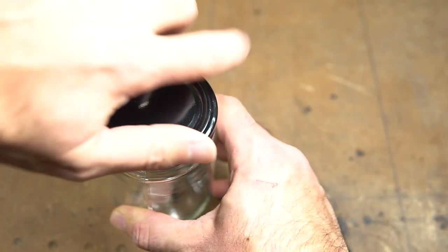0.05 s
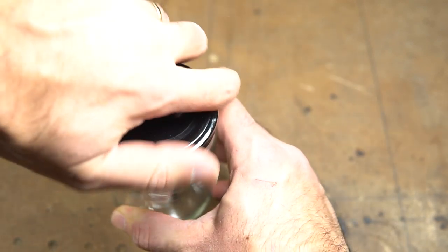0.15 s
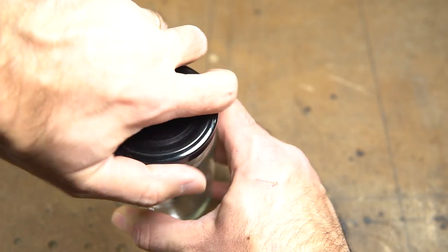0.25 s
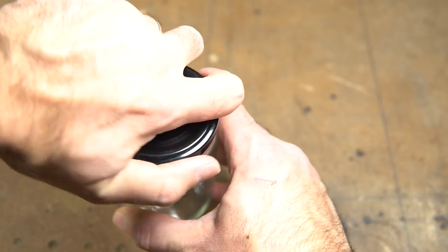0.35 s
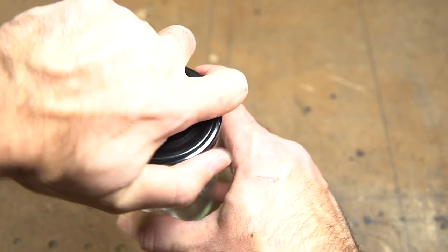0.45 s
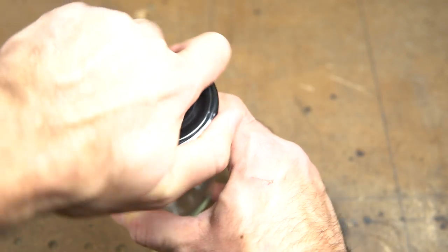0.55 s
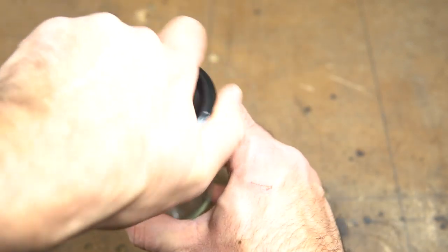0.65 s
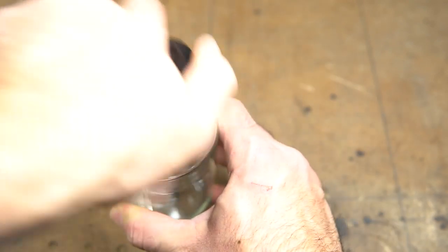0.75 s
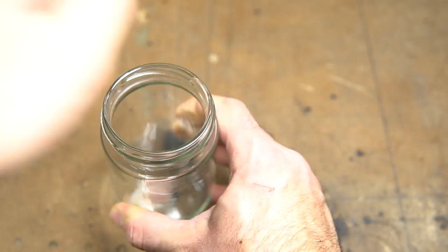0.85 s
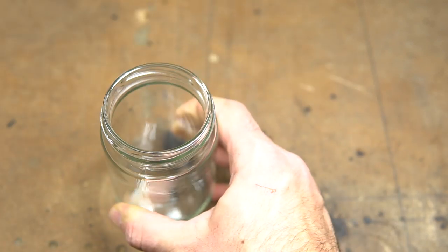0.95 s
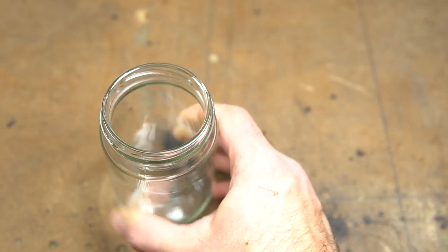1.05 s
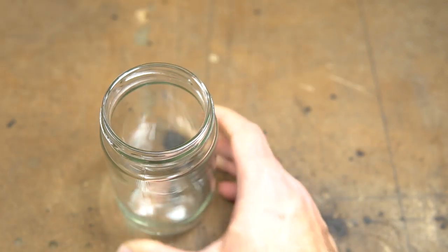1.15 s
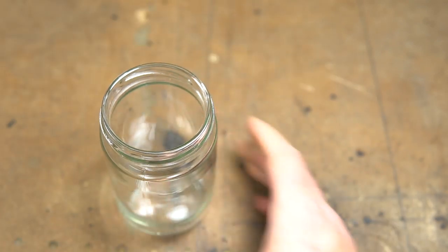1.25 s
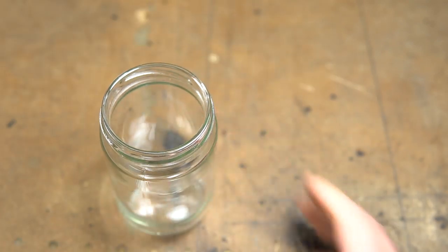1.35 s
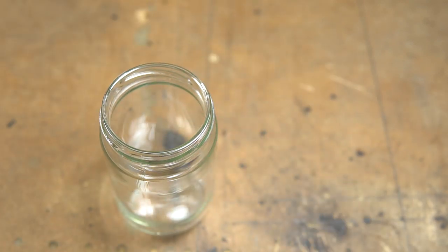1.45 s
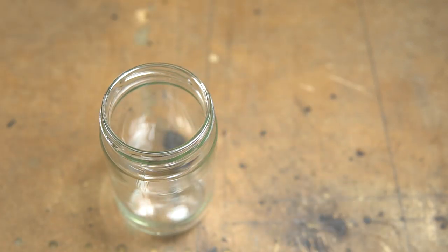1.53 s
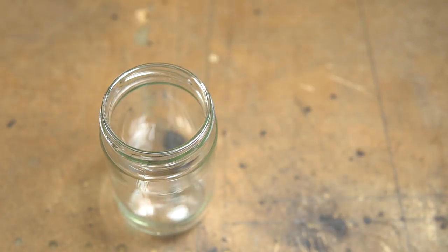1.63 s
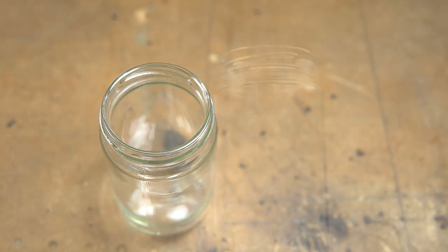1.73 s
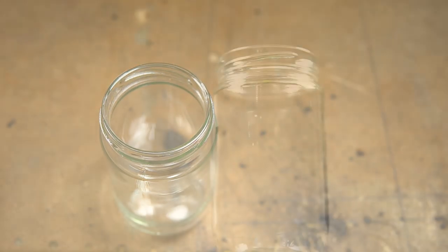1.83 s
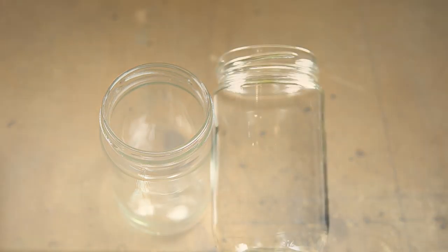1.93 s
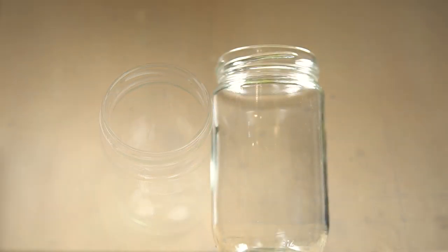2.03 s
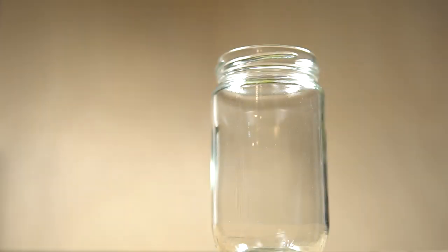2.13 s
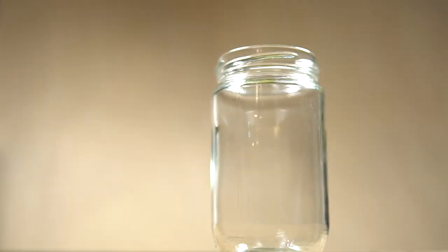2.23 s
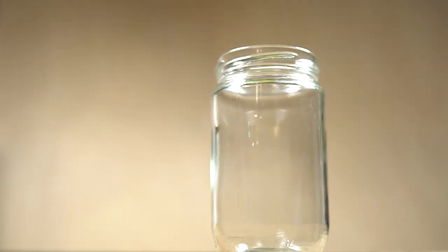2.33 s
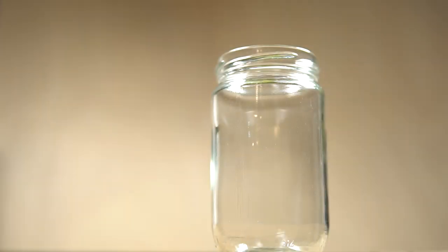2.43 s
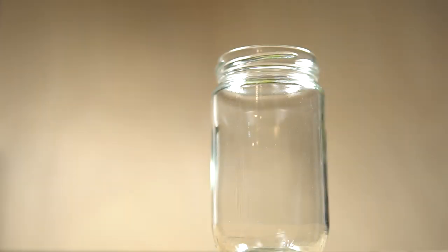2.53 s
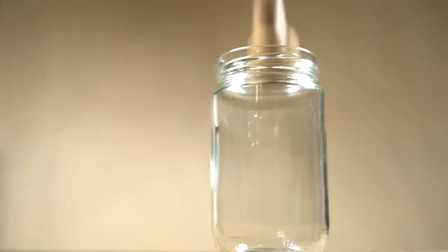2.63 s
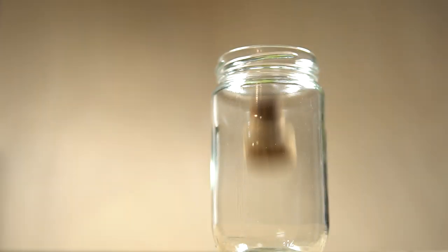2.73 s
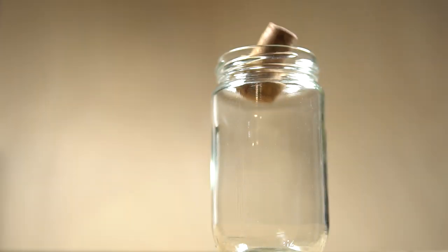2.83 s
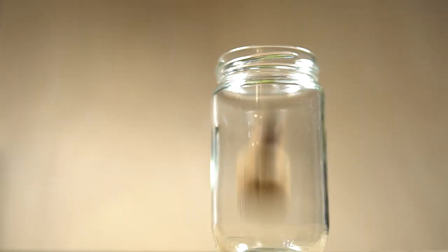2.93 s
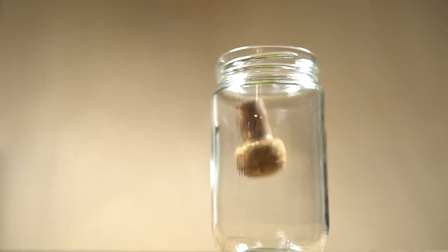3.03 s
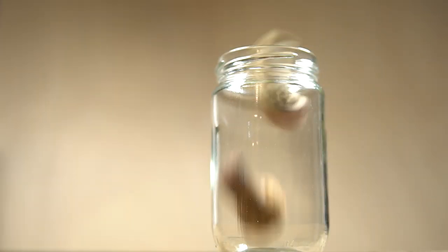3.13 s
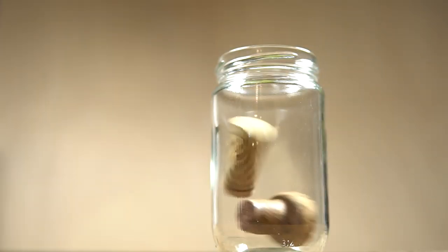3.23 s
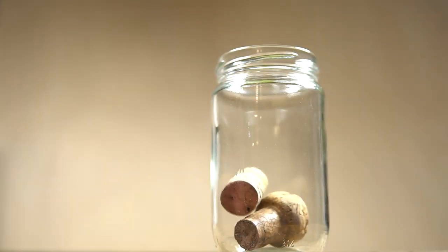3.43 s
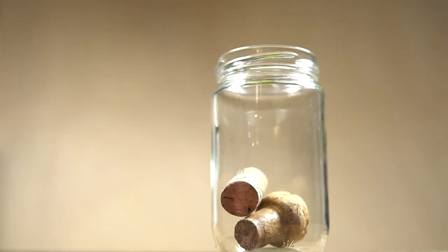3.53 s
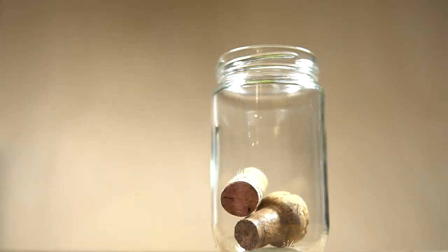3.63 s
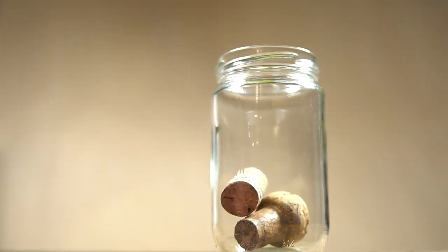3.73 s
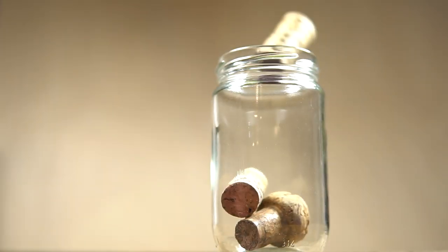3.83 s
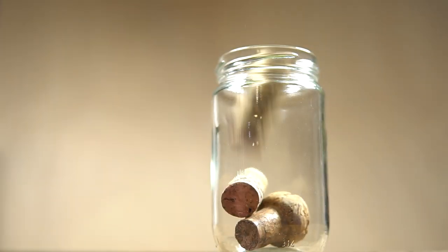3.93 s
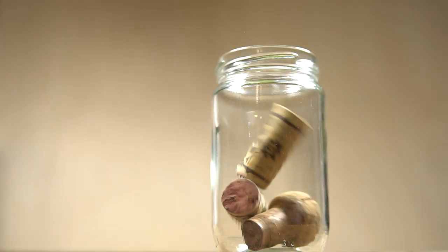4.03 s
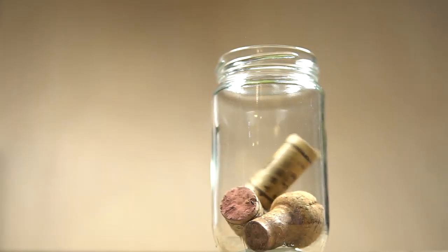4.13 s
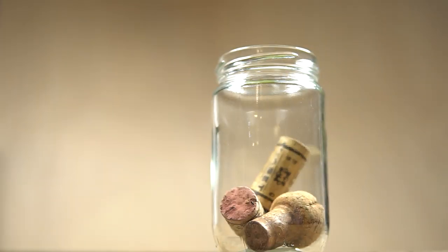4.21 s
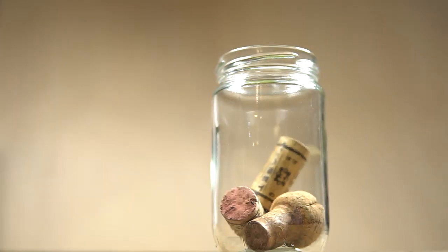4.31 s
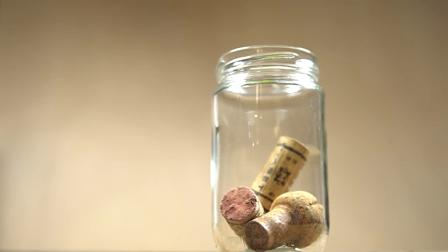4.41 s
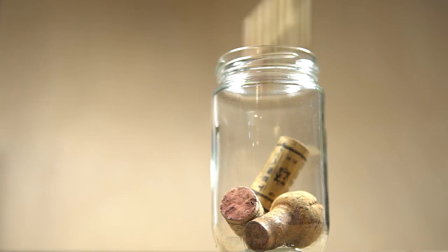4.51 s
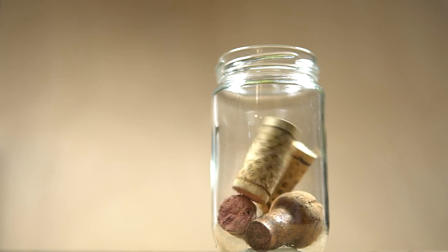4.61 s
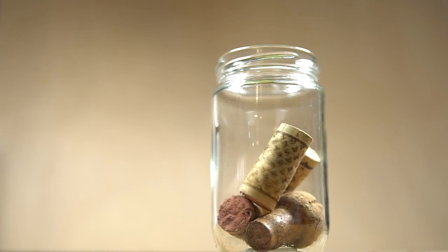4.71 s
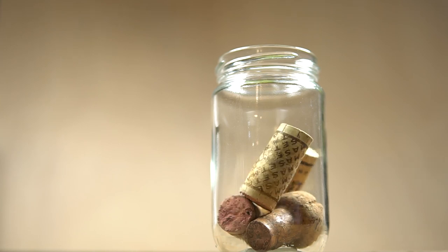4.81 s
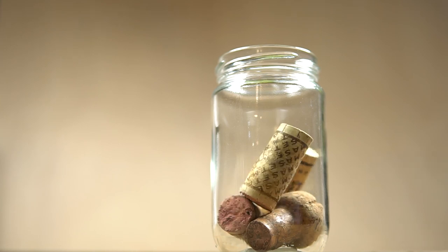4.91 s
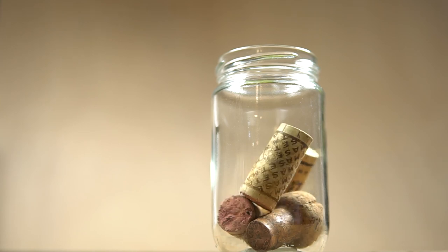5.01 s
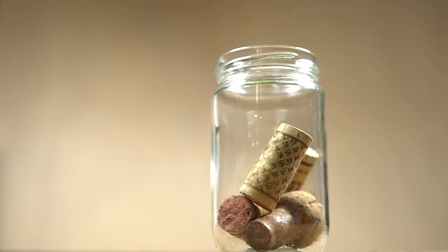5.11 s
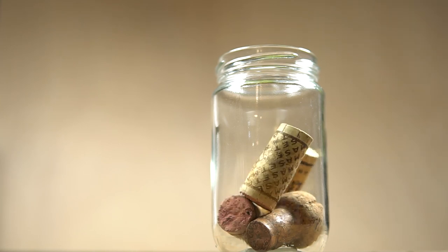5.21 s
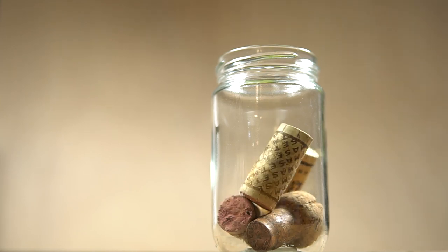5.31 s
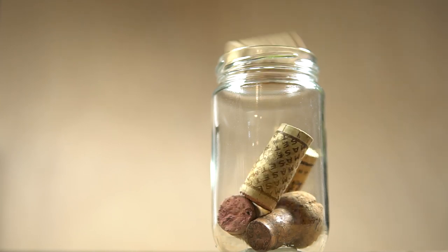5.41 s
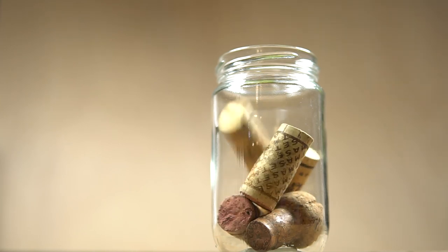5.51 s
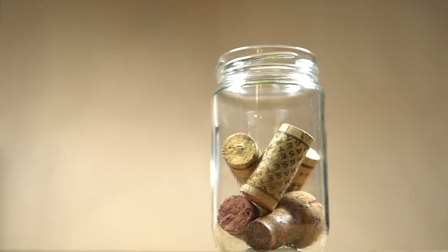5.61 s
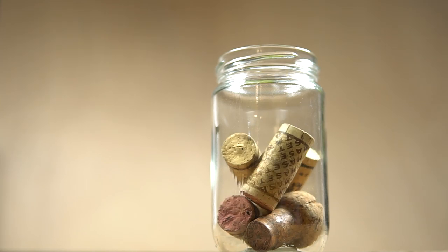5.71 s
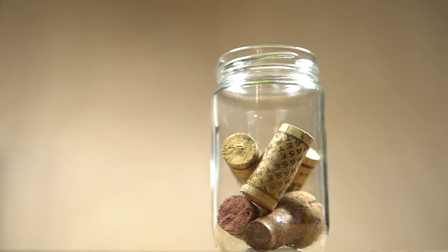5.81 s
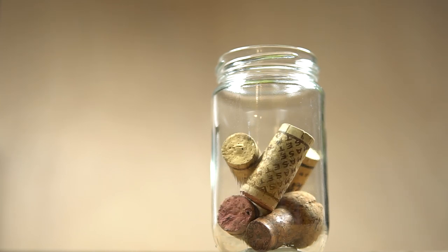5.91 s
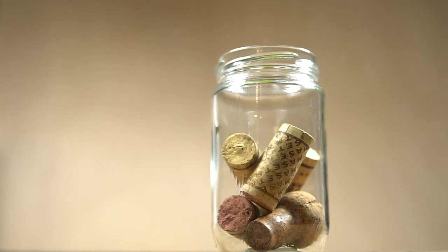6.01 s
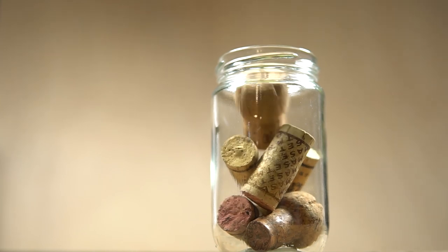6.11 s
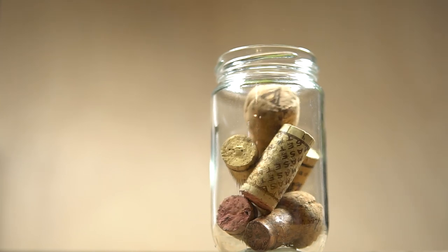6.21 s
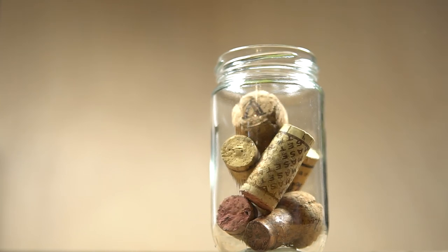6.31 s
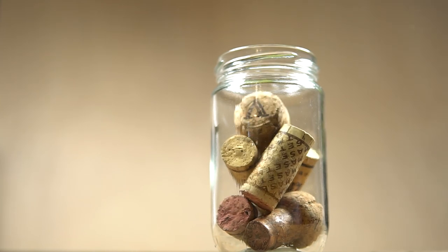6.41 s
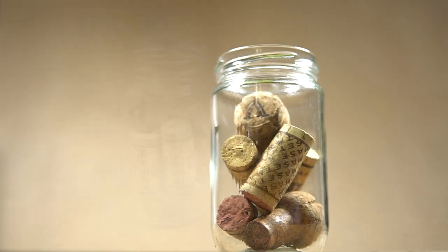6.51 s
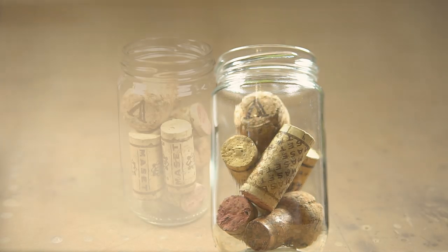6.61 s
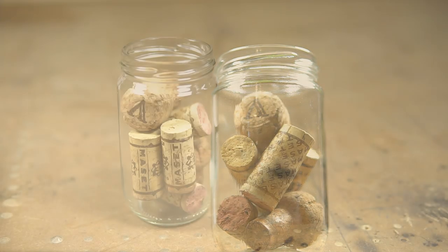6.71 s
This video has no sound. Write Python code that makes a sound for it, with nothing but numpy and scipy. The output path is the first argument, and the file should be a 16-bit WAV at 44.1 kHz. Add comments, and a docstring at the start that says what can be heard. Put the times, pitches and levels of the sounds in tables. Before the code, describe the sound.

Jar lid twisted off with gritty squeaks and ticks, soft set-down, then wine corks clatter singly into the glass amid light rustling, close indoors.

```python
"""In a small room, a hand twists the metal lid off an empty glass jar, sets the jar down and slides away.
The room tone then cross-fades to a more rumbling one, and corks drop into the jar one by one.
Each blow is decaying sines for table, air and glass plus noise bursts; the lid is random slips through resonances.
Fingers rustle among the waiting corks as grainy noise. Direct sounds are centred; echoes and room tone spread out.
"""
import sys
import numpy as np
from scipy import signal
from scipy.fft import rfft, irfft
from scipy.io import wavfile
from scipy.ndimage import uniform_filter1d

SR = 44100
rng = np.random.default_rng(int(sys.argv[2]) if len(sys.argv) > 2 else 0)


def dump(signal):
    """Clip the signal to [-1, 1] and save it as 16-bit WAV at the path in sys.argv[1]."""
    limited = np.clip(np.atleast_2d(signal).T, -1, 1)
    pcm = np.round(limited * 32767).astype(np.int16)
    wavfile.write(sys.argv[1], SR, pcm)


N = 297657


def amp(db):
    """Turn decibels into a linear gain."""
    return 10 ** (np.asarray(db) / 20)


def unit(x):
    """Scale to an RMS of 1."""
    return x / np.sqrt(np.mean(x ** 2))


def peak(x):
    """Scale to a peak of 1."""
    return x / np.abs(x).max()


def shape(x, points):
    """Colour a signal by (Hz, dB) points, joined along log frequency."""
    hz, db = np.transpose(points)
    f = np.maximum(np.arange(len(x) // 2 + 1) * SR / len(x), 1)
    gain = amp(np.interp(np.log(f), np.log(hz), db))
    return irfft(rfft(x) * gain, len(x))


def band(x, lo_hz, hi_hz):
    """Keep one band of frequencies."""
    edges = [lo_hz, min(hi_hz, .45 * SR)]
    return signal.sosfilt(signal.butter(2, edges, "bandpass", fs=SR, output="sos"), x)


def curve(rows, column=1, outside=-120):
    """Draw one table column as a line over time."""
    rows = np.array(rows)
    return np.interp(np.arange(N) / SR, rows[:, 0], rows[:, column], outside, outside)


def walk(rate):
    """Random levels held 1 / rate s and slewed twice; RMS 1 after the cut to length."""
    hold = int(SR / rate)
    steps = np.repeat(rng.standard_normal(N // hold + 1), hold)
    return unit(uniform_filter1d(uniform_filter1d(steps, hold), hold)[:N])


def fade(t, t60):
    """Exponential decay that loses 60 dB in t60 seconds."""
    return np.exp(-np.log(1000) * t / t60)


def swell(t, rise_s):
    """Soft onset of a body that takes a moment to answer."""
    return 1 - np.exp(-t / rise_s)


def ring(t, modes, spread_db, chance):
    """Decaying sines; the place of the blow sets how strongly each one starts."""
    return sum(amp(db + spread_db * c) * fade(t, t60) * np.sin(2 * np.pi * hz * t)
               for (hz, db, t60), c in zip(modes, chance))


def resonate(x, hz, width_hz):
    """Pass a signal through one narrow resonance."""
    return signal.lfilter(*signal.iirpeak(hz, hz / width_hz, SR), x)


def grains(rate, spread_db):
    """Uneven slips: random clicks of very different size, rate per second on average."""
    hits = rng.random(N) < rate / SR
    return hits * rng.standard_normal(N) * amp(spread_db * rng.exponential(size=N))


def add(out, s, x):
    """Mix a sound in, starting at s seconds."""
    i = int(s * SR)
    out[i:i + len(x)] += x[:N - i]


# Blows on the jar, with the drive into each part before that part's own mode levels and trims:
# start_s, knock_db, table_db, air_db, air_pitch_hz, overtone_db, wall_db, shoulder_db, crack_db
JAR_BLOWS = [(1.1155, -48, -58, -50, 602, -64, -62, -58, -54.5),
             (1.1313, -48.5, -47.5, -68, 620, -55, -79, -75, -64),
             (2.7644, -23.5, -20.5, -23.5, 643, -21.5, -39, -58, -20.5),
             (2.9182, -31.5, -43.5, -31, 560, -26.5, -28, -46, -47),
             (3.0297, -21.5, -17, -18.5, 638, -15.5, -42.5, -57, -29),
             (3.158, -42, -60.5, -60, 610, -65.5, -71.5, -75, -71.5),
             (3.1789, -27, -41, -15, 604, -44, -30.5, -61, -34.5),
             (3.2192, -31, -23.5, -18, 622, -24.5, -30.5, -44, -39),
             (3.2347, -45, -40, -23, 640, -36, -49, -56, -38),
             (3.2515, -29, -32.5, -25, 623, -7, -37, -60, -29.5),
             (3.265, -25.5, -27, -16.5, 647.5, -43, -41, -62, -37),
             (3.2994, -37, -58, -24, 651, -51, -40, -68, -64),
             (3.3242, -40, -43, -46, 616, -48, -57, -62, -45),
             (3.3486, -42, -54.5, -27.5, 638, -13, -37, -67, -33),
             (3.3667, -26.5, -32, -22.5, 644.4, -22, -66, -73, -57),
             (3.4101, -41, -37.5, -25.5, 650, -50, -68.5, -77, -54),
             (3.4444, -37.5, -42.5, -29.5, 655, -64, -64, -69, -62),
             (3.8374, -19.5, -33, -17.5, 637, -34, -33.5, -33, -25.5),
             (3.8603, -25.5, -37, -20, 657, -23, -33, -37.5, -35),
             (3.8846, -45, -36, -29.5, 650, -58, -37, -40, -39.5),
             (3.9879, -56, -51, -34, 638, -51, -56.5, -61, -53),
             (4.0259, -37, -33, -25, 676, -33, -47.5, -50, -35),
             (4.0445, -34, -38.5, -31, 652, -64, -45, -51, -40.5),
             (4.1314, -34, -37, -27, 672, -41, -59, -56, -43),
             (4.6166, -50.5, -34.5, -30.5, 707, -47.5, -63.5, -54, -39),
             (4.6284, -26.5, -35, -24, 707, -22, -55, -66, -40),
             (4.6417, -52, -37.5, -30.5, 688, -47, -38, -54, -36.5),
             (4.6597, -50.5, -40, -48, 660, -51, -51.5, -68, -41.5),
             (4.9303, -38.5, -68.5, -63, 668, -51, -69.5, -72, -45.5),
             (5.4676, -51, -48, -29, 640, -51, -53, -63, -51),
             (5.4809, -40, -41, -21.5, 650, -59, -43, -57, -47.5),
             (5.5189, -42, -40, -38.5, 697, -42.5, -72, -61, -42.5),
             (5.5583, -60, -44, -46.5, 677, -55, -49, -64, -49),
             (5.624, -41, -51, -35.5, 690, -58, -69, -59, -48),
             (5.634, -40.5, -42, -39, 720, -51.5, -51, -76, -43.5),
             (6.1538, -23.5, -28.5, -15.5, 639, -52.5, -32.5, -40.5, -39),
             (6.1754, -43, -54, -20.5, 689, -50, -60, -51, -33.5),
             (6.1885, -24, -29, -45, 670, -25, -35, -53, -52),
             (6.2306, -35.5, -51, -33.5, 665, -24, -64, -59, -46),
             (6.2568, -58, -55.5, -44, 630, -57, -70, -68, -39),
             (6.3616, -41.5, -51, -39, 677, -47, -70.5, -66, -38.5)]
# knocks above this level stop the ring already in the glass, dB lost per dB above
GRIP_FROM_DB, GRIP_SLOPE = -40, .75
# corks resting on the glass damp it: extra dB lost per s of ring, per s of filling
FILL_FROM_S, FILL_DB = 3.2, -18


def jar():
    """Every blow thuds the table, sounds the air column and its overtone, rings the glass and cracks."""
    out, rings, t = np.zeros(N), np.zeros(N), np.arange(int(.6 * SR)) / SR
    rows = np.array(JAR_BLOWS)
    chance, noise = rng.standard_normal((len(rows), 9)), rng.standard_normal((len(rows), 3, 2048))
    # a cork landing hard takes energy out of the ring already there
    kept_db = np.zeros(N + len(t))
    kept_db[(rows[:, 0] * SR).astype(int)] = -GRIP_SLOPE * np.maximum(rows[:, 1] - GRIP_FROM_DB, 0)
    kept_db = np.cumsum(kept_db)
    for (s, knock, table, air, air_hz, over, wall, shoulder, crack), c, n in zip(rows, chance, noise):
        i = int(s * SR)
        damping_db = kept_db[i:i + len(t)] - kept_db[i] + FILL_DB * max(s - FILL_FROM_S, 0) * t
        add(rings, s, amp(damping_db) * glass_ring(t, wall, shoulder, crack, c))
        x = jar_air(t, s, air, air_hz, over, c) + table_and_base(t, s, table, crack, c, n[2])
        x[:2048] += impact_noise(t[:2048], knock, crack, n)
        add(out, s, x)
    return out, rings


# Ring of the jar's wall, before damping by the corks: pitch_hz, level_db, t60_s
WALL_MODES = [(3303, 0, .36), (3333, -12, .3), (10360, -22, .1), (13800, -25, .06)]
# Ring of the jar's shoulder, before the same damping: pitch_hz, level_db, t60_s
SHOULDER_MODES = [(7068, -1, .14)]
# Ring of the jar's neck, before the same damping: pitch_hz, level_db, t60_s
NECK_MODES = [(6115, -6, .09)]
NECK_DB = -10.5  # relative to the crack


def glass_ring(t, wall_db, shoulder_db, crack_db, chance):
    """Wall, shoulder and neck vibrate as long thin decaying sines."""
    glass = amp(wall_db) * ring(t, WALL_MODES, 0.47, chance)
    glass += amp(shoulder_db) * ring(t, SHOULDER_MODES, 1, chance)
    glass += amp(crack_db + NECK_DB) * ring(t, NECK_MODES, 1, chance[1:])
    return swell(t, 0.00033) * glass


AIR_T60_S, OVERTONE_T60_S, AIR_SWELL_S = 0.072, 0.021, 0.00029
# the overtone drops as corks come to lie on the bottom; each blow scatters it by a share of its pitch
OVERTONE_S, OVERTONE_HZ, OVERTONE_SCATTER = (3.22, 3.25), (2079, 1967), 0.021


def jar_air(t, s, air_db, air_hz, over_db, chance):
    """The air in the jar answers a blow with a short hollow note and a shorter overtone."""
    over_hz = np.interp(s, OVERTONE_S, OVERTONE_HZ) * (1 + OVERTONE_SCATTER * chance[8])
    note = ring(t, [(air_hz, air_db, AIR_T60_S)], 0, chance)
    overtone = ring(t, [(over_hz, over_db, OVERTONE_T60_S)], 0, chance)
    return swell(t, AIR_SWELL_S) * (overtone - note)


# Thud of the wooden table: pitch_hz, level_db, t60_s
TABLE_MODES = [(59.8, -7.5, 0.11), (115, -6.5, 0.15), (169.5, -8.5, 0.125), (218.1, -1.5, 0.21),
               (247, -7.5, 0.19), (268.5, -2, 0.14), (314.6, -3, 0.042), (397, -6, 0.081),
               (430, -19.5, 0.0912)]
# Ring of the jar's base, before its glide bends pitch and decay: pitch_hz, level_db, t60_s
BASE_MODES = [(2930, -3, .11), (3010, -5, .13), (3100, -7, .1), (3300, -3, .03), (3817, -15, .14),
              (4818, -12, .04)]
# Ring of the jar's rim: pitch_hz, level_db, t60_s
RIM_MODES = [(9320, -3, .045), (15640, -18, .04)]
BASE_DB, RIM_DB = -8.5, -4.5  # base relative to the table thud, rim to the crack
# corks come to lie on the bottom between these times: base and rim are muffled
COVER_S, COVER_BASE_DB, COVER_RIM_DB = (3.25, 3.77), -23, -8.5
FIRST_CORK_S, HELD_DB = 2, -9  # before this the base is held on the table and stays dull
# the base starts this share flat and rises to the same share sharp as the cork lifts off
BASE_GLIDE, BASE_GLIDE_S = 0.02, .05
RATTLE_DB, RATTLE_T60_S = -8, 0.075


def table_and_base(t, s, table_db, crack_db, chance, noise):
    """The heavy table swells slowly, base and rim ring on it, and the jar chatters after the blow."""
    cover = np.interp(s, COVER_S, (0, 1))
    base_db = table_db + BASE_DB + cover * COVER_BASE_DB + HELD_DB * (s < FIRST_CORK_S)
    rim_db = crack_db + RIM_DB + cover * COVER_RIM_DB
    loose = amp(table_db) * swell(t, 0.0017) * ring(t, TABLE_MODES, 1.0, chance)
    rising = t + BASE_GLIDE * (t - 2 * BASE_GLIDE_S * swell(t, BASE_GLIDE_S))
    loose += amp(base_db) * ring(rising, BASE_MODES, 2.5, chance)
    loose += amp(rim_db) * ring(t, RIM_MODES, 0.88, chance)
    # the chatter stirs these modes again
    chatter = noise * fade(t[:len(noise)], RATTLE_T60_S)
    chatter /= np.linalg.norm(chatter)
    return loose + amp(RATTLE_DB) * signal.fftconvolve(loose, chatter)[:len(t)]


KNOCK_T60_S, CRACK_T60_S = 0.03, 0.011
CLATTER_DB, CLATTER_T60_S = -17, 0.13  # relative to the crack


def impact_noise(t, knock_db, crack_db, noise):
    """A dull knock and a bright crack, which leaves a short noisy tail in the jar."""
    crack = amp(crack_db) * unit(band(noise[0], 4940, 12000)) * fade(t, CRACK_T60_S)
    clatter = amp(crack_db + CLATTER_DB) * unit(band(noise[2], 1800, 8100)) * fade(t, CLATTER_T60_S)
    knock = amp(knock_db) * peak(band(noise[1], 600, 1700) * fade(t, KNOCK_T60_S))
    return crack + clatter + knock


# Resonances of the metal lid: pitch_hz, width_hz, level_db
LID_MODES = [(1700, 60, -5.5), (1804, 113, -1), (1890, 242, 0), (2480, 330, -8.5), (3290, 89, -7.5),
             (3298, 590, -20), (4470, 590, -30), (6890, 1500, -6.5)]


def metal(x):
    """The lid's resonances, each scaled so that a unit blow rings it at its own level."""
    return sum((-1) ** k * amp(db) * resonate(x, hz, width) * SR / (2 * np.pi * width)
               for k, (hz, width, db) in enumerate(LID_MODES))


# The lid turning on the thread (trapped air, grip on the jar, slip of the thread):
# start_s, air_db, air_pitch_hz, grip_db, slip_db
LID_TWIST = [(0.33, -80, 286.6, -97, -83), (0.412, -52.5, 309, -75, -59.5), (0.502, -54.5, 288, -74, -63),
             (0.53, -42.5, 273.2, -38.5, -45.5), (0.595, -40, 298.6, -53.5, -67),
             (0.64, -39.5, 305, -54.5, -61), (0.698, -40, 320, -47.5, -81),
             (0.73, -38.5, 349, -45.5, -47.5), (0.765, -43, 398, -58, -49.5), (0.816, -87, 323, -105, -110),
             (0.95, -72, 348, -105, -92)]
# Ticks of the lid; click before its band filter, ring as the blow on the lid's resonances:
# start_s, click_db, ring_db
TICKS = [(0.423, -29, -57), (0.4858, -45, -58), (0.5078, -15.5, -37), (0.5322, -13.5, -29.5),
         (0.5601, -17.5, -40), (0.5763, -26, -34.5), (0.5969, -22.5, -33.5), (0.6737, -41, -34.5),
         (0.7024, -47, -30), (0.7105, -32, -28), (0.7344, -31, -15.5), (0.7484, -29, -28),
         (0.7591, -27, -37), (0.7625, -15, -46)]
LID_DB = 2.5  # the lid's ring over the mean of grip and slip
LOOSEN_FROM_S, LOOSEN_DB_PER_S = 0.55, 55.5  # the lid rings more freely as it comes loose
SHAKE_DB = 1.5  # table shake over the grip


def lid():
    """Stick-slip on the thread shakes lid, jar, table and the trapped air, whose pitch rises as the gap opens."""
    slips, ticks, rings = grains(5000, 2.2), np.zeros(N), np.zeros(N)
    tick_t = np.arange(88) / SR
    for s, click_db, ring_db in TICKS:
        add(ticks, s, amp(click_db) * peak(rng.standard_normal(88) * fade(tick_t, 0.0076)))
        add(rings, s, amp([ring_db]))
    # two random walks on a carrier make a breathy, wavering note
    phase = 2 * np.pi * np.cumsum(curve(LID_TWIST, column=2, outside=300)) / SR
    air = walk(220) * np.cos(phase) + walk(220) * np.sin(phase)
    grip_db, slip_db = curve(LID_TWIST, column=3), curve(LID_TWIST, column=4)
    loose_db = LOOSEN_DB_PER_S * np.clip(np.arange(N) / SR - LOOSEN_FROM_S, -.1, .3)
    trapped_air = unit(air) * amp(curve(LID_TWIST))
    lid_ring = unit(metal(slips)) * amp((grip_db + slip_db) / 2 + LID_DB + loose_db)
    scrape = unit(band(slips, 1805, 13900)) * amp(slip_db)
    table_shake = unit(band(slips, 49.8, 254)) * amp(grip_db + SHAKE_DB)
    jar_body = unit(resonate(slips, 698, 49) + 0.35 * band(slips, 480, 1600)) * amp(grip_db)
    return trapped_air + lid_ring + scrape + table_shake + jar_body + band(ticks, 1650, 6050) + metal(rings)


SET_DOWN_S, SET_DOWN_DB = 1.116, -32.5


def set_down():
    """The jar's weight thuds the three lowest table modes."""
    out, t = np.zeros(N), np.arange(SR // 4) / SR
    add(out, SET_DOWN_S, amp(SET_DOWN_DB) * ring(t, TABLE_MODES[:3], 0, np.zeros(3)))
    return out


# Colour of skin on wood, relative noise density: pitch_hz, level_db (per Hz)
SLIDE_SPECTRUM = [(710, -13.5), (1200, -12.5), (1730, -1), (2510, -9.5), (3250, -5), (6300, -13.5),
                  (9720, -1.5), (11400, -9), (16000, -15)]
# it swells up to this time and level, holds, then stops fast
SLIDE_S, SLIDE_DB, SLIDE_HOLD_S, SLIDE_RISE_DB_PER_S, SLIDE_FALL_DB_PER_S = 1.242, -52, 0.078, 220, 700


def hand_slide():
    """Skin sliding over the wood: coloured noise with a slightly fluttering level."""
    since = np.arange(N) / SR - SLIDE_S
    fall_db = np.minimum(0, SLIDE_FALL_DB_PER_S * (SLIDE_HOLD_S - since))
    slide_db = SLIDE_DB + np.minimum(SLIDE_RISE_DB_PER_S * since, fall_db)
    return unit(shape(rng.standard_normal(N), SLIDE_SPECTRUM)) * amp(slide_db + walk(59.8))


# Fingers rustling among the corks; length is the decay to 1/e: start_s, peak_db, length_s, centre_hz
CORK_RUSTLES = [(0.19, -53, 0.048, 7700), (0.28, -52.5, 0.044, 7500), (2.375, -56, 0.046, 11200),
                (2.639, -46.5, 0.013, 8700), (3.501, -37.5, 0.021, 9200), (3.534, -42, 0.025, 10500),
                (3.557, -44, 0.014, 5900), (3.625, -45.5, 0.046, 8650), (3.658, -50, 0.057, 9800),
                (4.133, -37, 0.018, 10200), (4.157, -55, 0.033, 9700), (4.211, -46, 0.059, 11300),
                (4.772, -38.5, 0.03, 10300), (4.795, -35.5, 0.059, 10000), (4.901, -42.5, 0.065, 8470),
                (4.965, -47, 0.024, 6500), (5.02, -45.5, 0.034, 8200), (5.144, -45.5, 0.07, 9970),
                (5.218, -46, 0.05, 10100), (5.294, -56.5, 0.027, 8800), (5.353, -51.5, 0.027, 8850),
                (5.6494, -48, 0.039, 6300), (5.76, -51.5, 0.02, 5600)]


def rustles():
    """Grainy slips flicker in level, each rustle with its own colour."""
    out = np.zeros(N)
    low, high = (grains(9000, 2.54) * amp(3.6 * walk(60)) for _ in range(2))
    for s, db, length, hz in CORK_RUSTLES:
        i, t = int(s * SR), np.arange(int(5 * length * SR)) / SR
        body = band(band(low[i:][:len(t)], 0.7 * hz, 1.35 * hz), .5 * hz, 2 * hz)
        fizz = .45 * band(high[i:][:len(t)], 0.95 * hz, 18700)
        add(out, s, amp(db) * peak((body + fizz) * swell(t, 0.0095) * np.exp(-t / length)))
    return out


# Decay of the room's echoes in two-octave bands: centre_hz, t60_s
ECHO_T60 = [(125, .5), (500, .4), (2000, .26), (8000, .17)]
ROOM_DB = -10


def room(x):
    """Diffuse echoes: noise that dies faster in the treble."""
    t = np.arange(int(.6 * SR)) / SR
    tail = sum(band(rng.standard_normal(len(t)), hz / 2, hz * 2) * fade(t, t60) for hz, t60 in ECHO_T60)
    tail *= swell(t, 0.003)
    return amp(ROOM_DB) * signal.fftconvolve(x, tail / np.sqrt(np.sum(tail ** 2)))[:N]


# Colour of the quieter room tone, relative noise density: pitch_hz, level_db (per Hz)
QUIET_TONE = [(15, -59), (25, -1), (48, 9.5), (553, -14), (831, -18), (1010, -19), (1780, -18), (2150, -20),
              (3410, -22), (14800, -26.5), (16500, -33)]
# Colour of the rumbling room tone, relative noise density: pitch_hz, level_db (per Hz)
RUMBLE_TONE = [(15, -61.5), (25, -12.5), (114, 0), (146, -11), (226, -11.5), (313, -21.5), (457, -24),
               (510, -28), (878, -32.5), (1030, -28.5), (1360, -34.5), (2040, -38), (4480, -43),
               (14800, -44), (16500, -72.5)]
QUIET_DB, RUMBLE_DB, FADE_S = -57.5, -49, (1.52, 2.09)


def room_tone():
    """Two steady coloured noises; the quiet one cross-fades into the rumbling one."""
    mix = np.interp(np.arange(N) / SR, FADE_S, (0, 1))
    quiet = amp(QUIET_DB) * unit(shape(rng.standard_normal(N), QUIET_TONE))
    rumble = amp(RUMBLE_DB) * unit(shape(rng.standard_normal(N), RUMBLE_TONE))
    return quiet * (1 - mix) + rumble * mix


# Stereo width, gain of the side signal: pitch_hz, side_db
SIDE_GAIN = [(60, -40), (200, -15.5), (500, -3), (2400, 1), (15000, 0)]
# Balance, left minus right: pitch_hz, difference_db
BALANCE = [(100, 0), (300, -1), (700, 0.1), (1300, 0), (2400, -3), (4400, -3), (8000, -1), (15000, -0.8)]
# the ringing of wall, shoulder and neck is sent more softly to the middle echoes, so it stays clear and steady
GLASS_ROOM_DB = -12


def scene():
    """Mix direct sounds in the centre, with independent echoes and room tone in middle and side."""
    knocks, glass = jar()
    near = knocks + lid() + set_down() + hand_slide() + rustles()
    send = near + amp(GLASS_ROOM_DB) * glass
    mid = near + glass + room(send) + room_tone()
    side = shape(amp(-5.0) * room(near + glass) + room_tone(), SIDE_GAIN)
    lean = np.array(BALANCE) * [1, .5]  # half the difference for each channel
    return np.array([shape(mid + side, lean), shape(mid - side, lean * [1, -1])])


TOP_HZ = 16300


def record(dry):
    """The microphone rolls off the deepest bass; the recorder cuts the top steeply."""
    dry = signal.sosfilt(signal.butter(4, 42, "highpass", fs=SR, output="sos"), dry)
    return signal.sosfilt(signal.ellip(8, .2, 70, TOP_HZ, fs=SR, output="sos"), dry)


dry = scene()
out = record(dry)
dump(out)
```